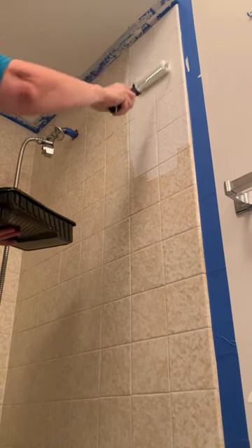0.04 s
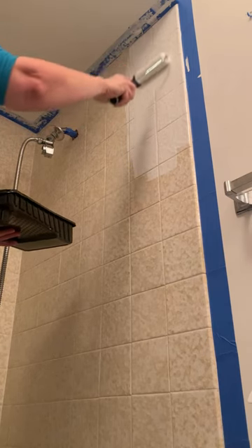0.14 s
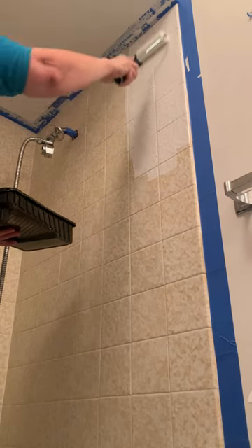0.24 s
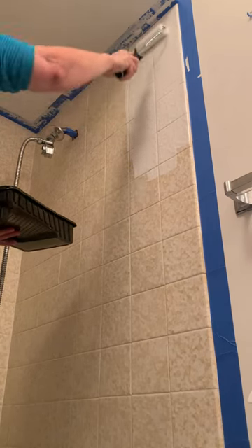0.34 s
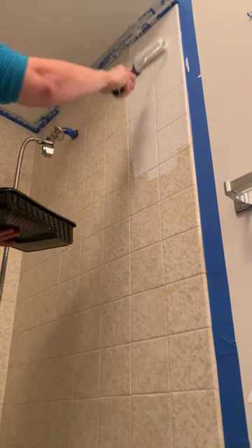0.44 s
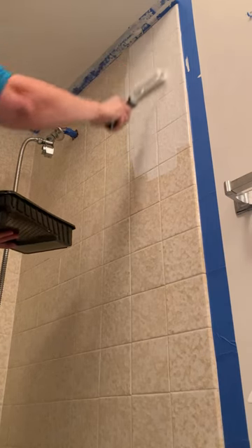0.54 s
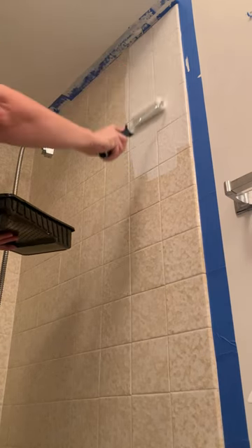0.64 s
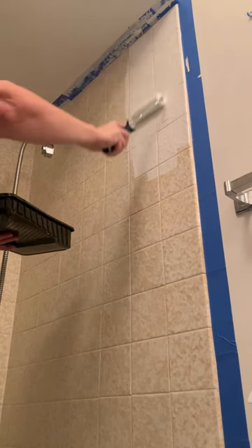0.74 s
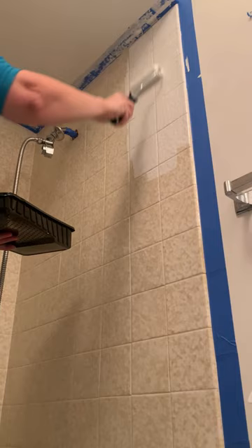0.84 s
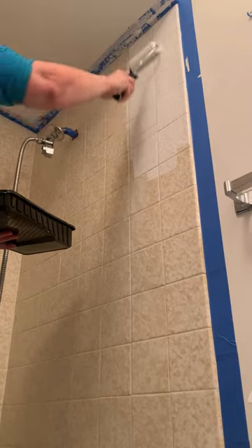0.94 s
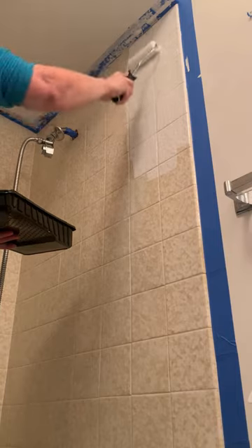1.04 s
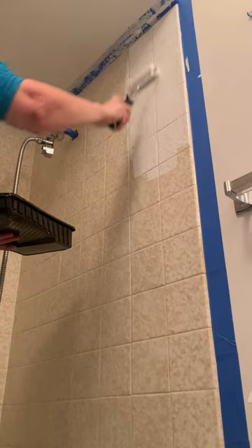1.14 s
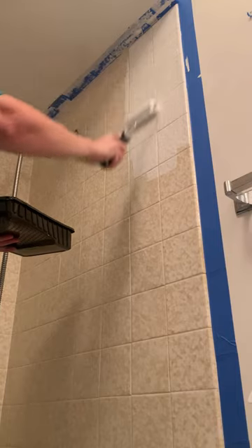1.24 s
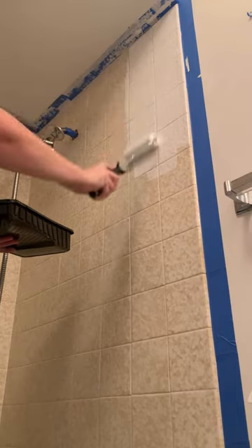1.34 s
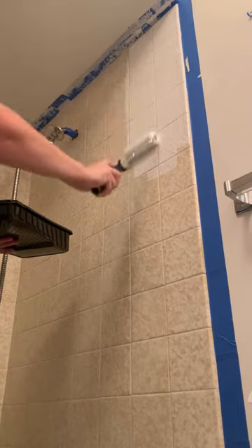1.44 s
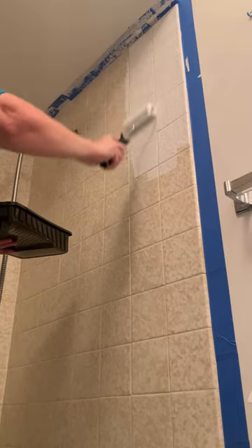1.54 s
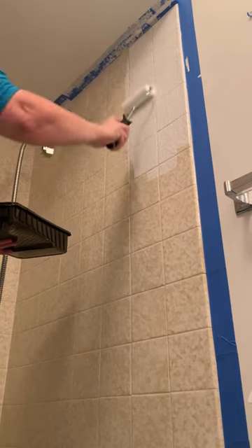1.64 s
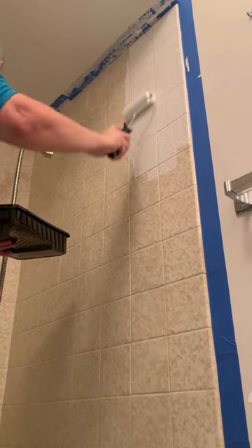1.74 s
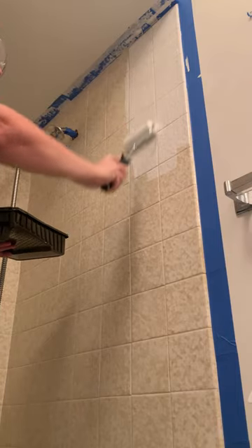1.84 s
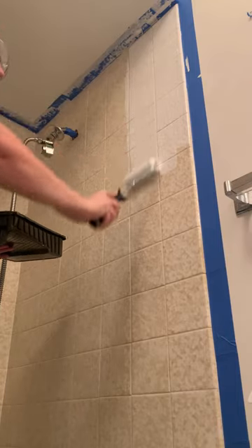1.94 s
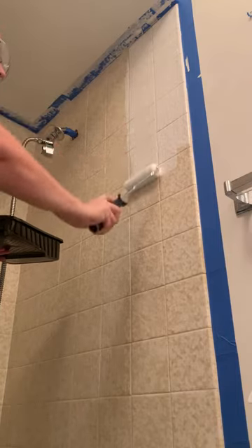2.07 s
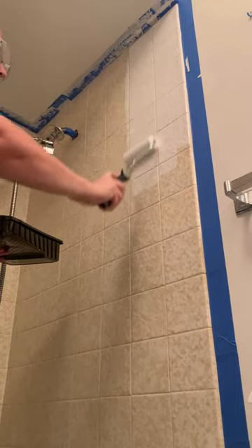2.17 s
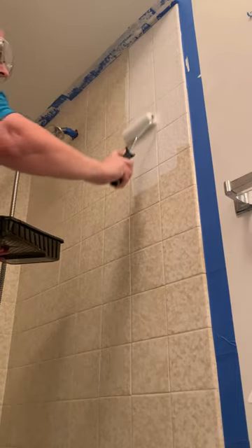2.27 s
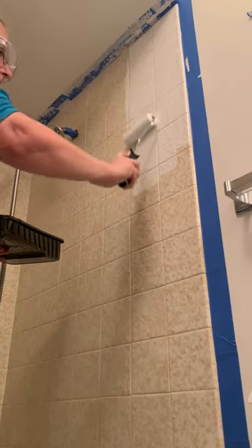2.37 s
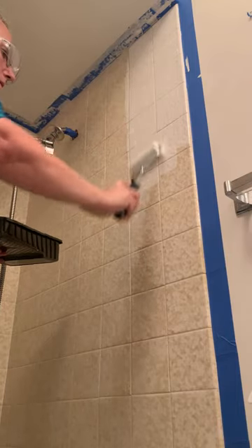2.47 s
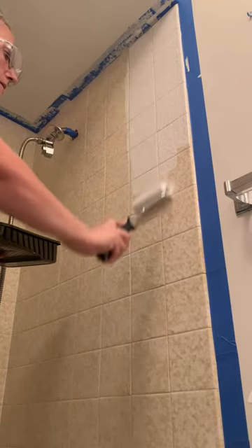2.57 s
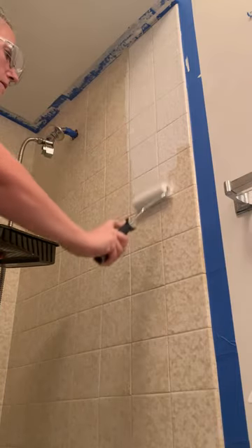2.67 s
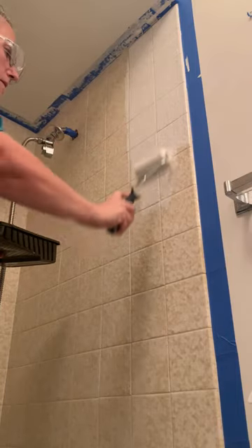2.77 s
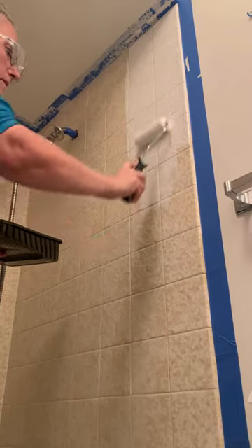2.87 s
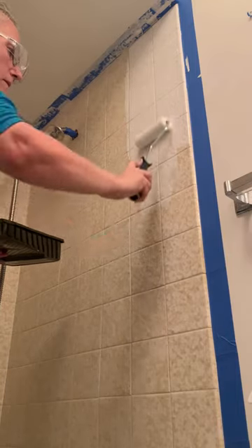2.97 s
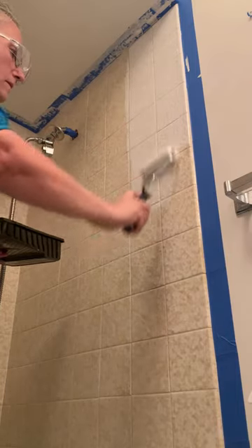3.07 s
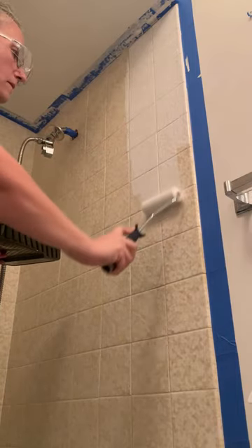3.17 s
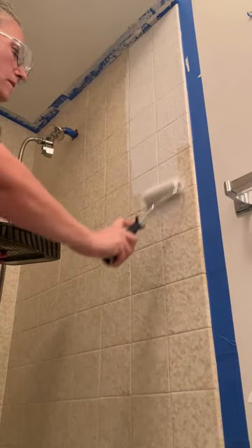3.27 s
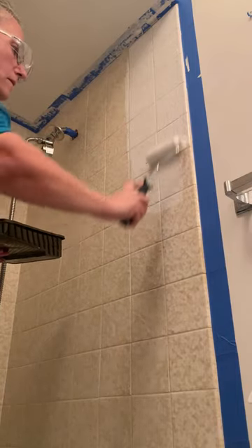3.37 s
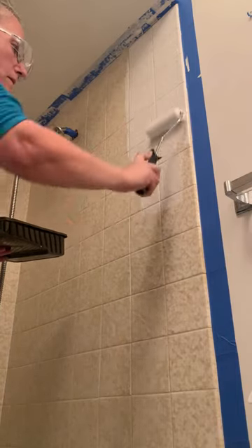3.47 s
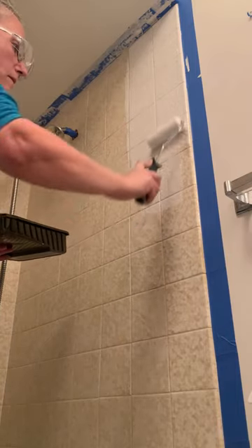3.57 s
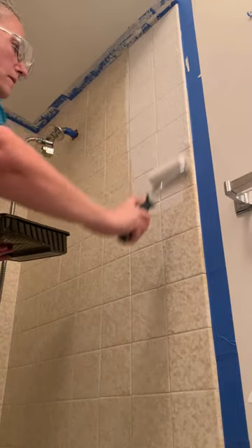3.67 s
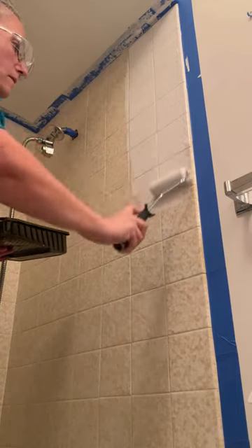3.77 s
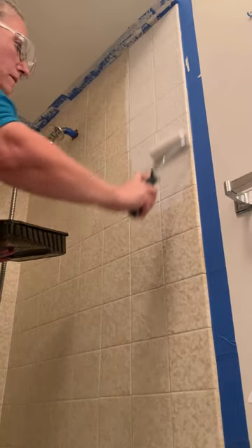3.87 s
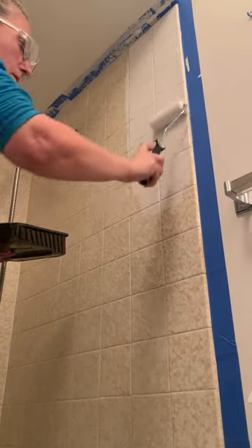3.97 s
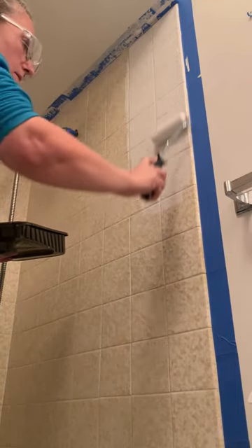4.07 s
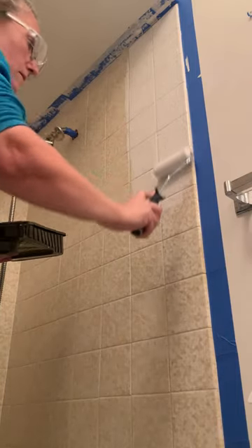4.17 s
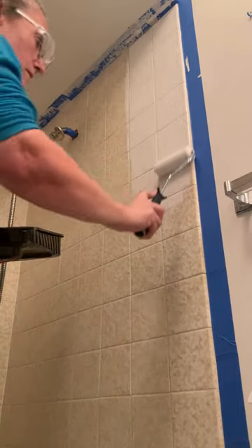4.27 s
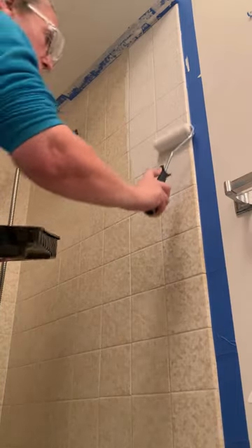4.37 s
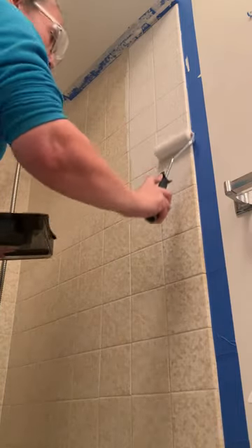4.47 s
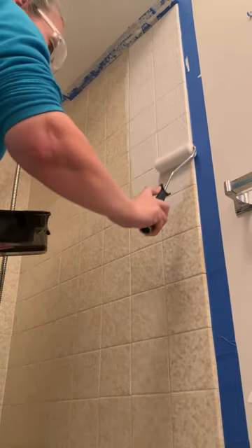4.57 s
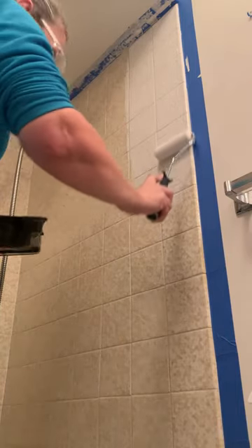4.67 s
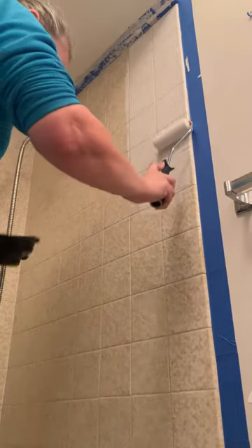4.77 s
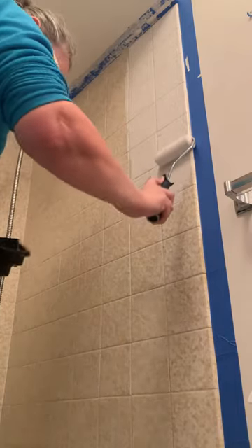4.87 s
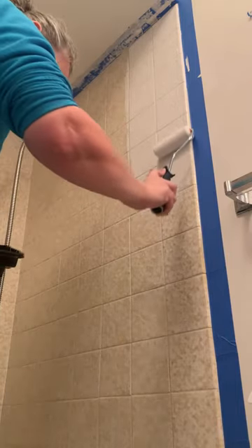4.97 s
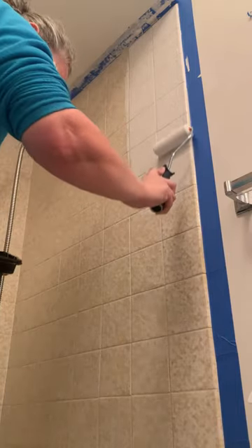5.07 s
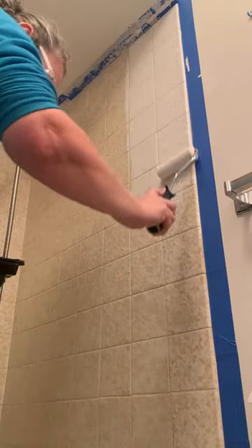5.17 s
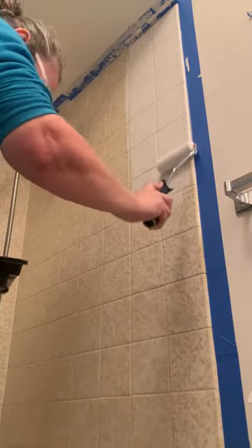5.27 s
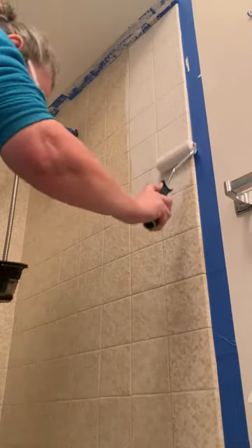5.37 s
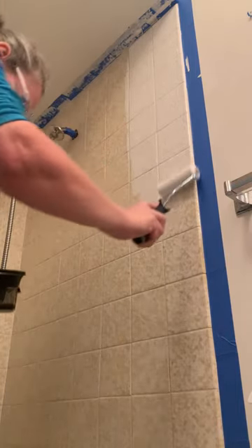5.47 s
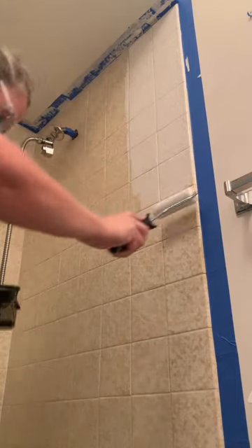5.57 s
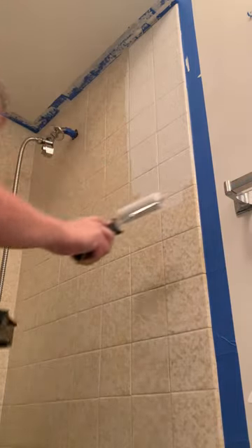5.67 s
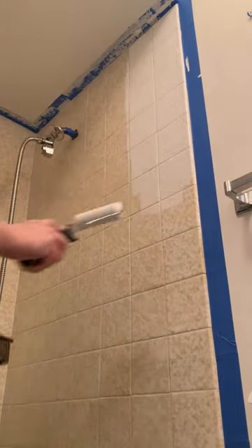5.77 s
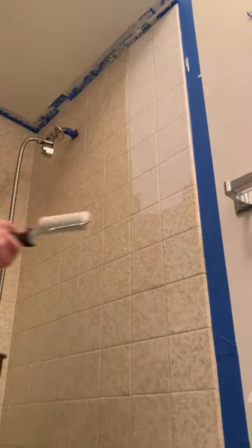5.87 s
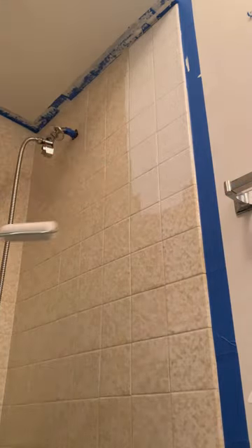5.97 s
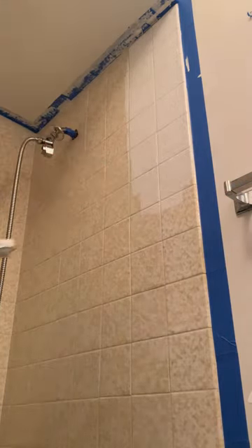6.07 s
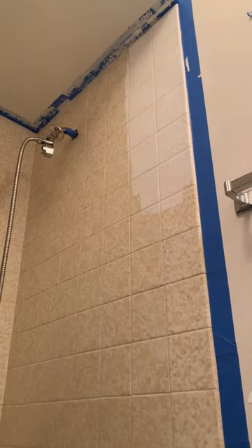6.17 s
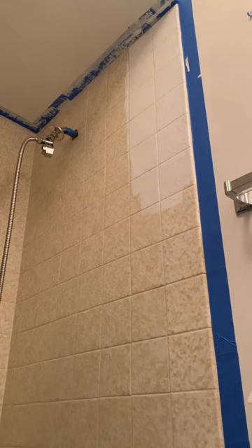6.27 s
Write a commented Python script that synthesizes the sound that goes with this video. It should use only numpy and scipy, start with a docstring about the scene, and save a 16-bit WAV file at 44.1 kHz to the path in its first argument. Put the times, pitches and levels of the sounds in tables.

```python
"""In a small tiled shower stall, a foam roller runs up and down over wet paint on the wall. Random clicks,
filtered, make the fine fizz of snapping paint strands, the squelch and the rub; short pings are bursting
bubbles, ticks are tearing threads. Filtered noise is the rumble of the hollow wall and the murmur of the house;
decaying sines boom at each thump. The roller scrapes and lifts off, its cage knocks, and the plastic paint tray
in the other hand knocks and rattles in bursts of contacts."""
import sys
import numpy as np
from scipy import signal
from scipy.fft import rfft, irfft
from scipy.io import wavfile
from scipy.ndimage import uniform_filter1d

SR = 44100
rng = np.random.default_rng(int(sys.argv[2]) if len(sys.argv) > 2 else 0)


def wav_record(signal):
    """Record a signal, one row per channel, as 16-bit PCM in the file named by sys.argv[1]."""
    frames = np.transpose(np.atleast_2d(signal))
    bounded = np.clip(frames, -1, 1)
    # unit amplitude maps onto the largest positive 16-bit level
    quanta = np.round(bounded * 32767).astype(np.int16)
    wavfile.write(sys.argv[1], SR, quanta)


N = 278712
T = np.arange(N) / SR
LIFT_OFF_S = 5.415  # the roller leaves the wall

# spectrum of squelching wet foam: [f/Hz, density/dB per Hz]
SQUELCH_SPECTRUM = [(100, -15.5), (300, -0.5), (500, 2), (800, 1.5), (1150, -1), (1600, -2.5), (2500, -9),
                    (4000, -3), (6000, -27.5), (10000, -20)]
# resonances of the roller cage: [f/Hz, width/Hz, height above the spectrum/dB]
CAGE_PEAKS = [(600, 20, 2.5), (798, 66, 2), (1060, 36, 5.5), (1190, 64, 6), (1400, 76, 5.5), (1575, 41, 7),
              (1980, 660, 6.5)]
# low booms of the stall: [f/Hz, width/Hz, height above the spectrum/dB]
STALL_BOOMS = [(35.5, 5.9, 3.8), (76.3, 12, 10.6), (120, 7.6, 7.8), (159.6, 11.2, 8.5), (192, 7.5, 5),
               (278.5, 24, 6.5), (374, 22, 8)]


def amp(db):
    """Decibels to gain."""
    return 10 ** (np.asarray(db) / 20)


def unit(x):
    """Scales to rms 1."""
    return x / np.sqrt(np.mean(x ** 2) + 1e-20)


def read(points, hz):
    """Reads a table on a log-frequency axis."""
    f, value = np.transpose(points)
    return np.interp(np.log(hz + 1), np.log(f + 1), value)


def add(mix, s, sound):
    """Mixes a sound in at time s."""
    part = mix[round(s * SR):][:len(sound)]
    part += sound[:len(part)]


def colour(x, spectrum, peaks=(), tilt_db=0, size=8192):
    """Causal filter: a spectrum, resonances on top and a tilt in dB per octave above 1 kHz."""
    hz = abs(np.fft.fftfreq(size, 1 / SR))
    db = read(spectrum, hz) + tilt_db * np.log2(np.maximum(hz, 1000) / 1500)
    for f, width, height in peaks:
        db = db + height / (1 + (2 * (hz - f) / width) ** 2)
    # minimum phase: the energy comes as early as the spectrum allows
    response = np.exp(signal.hilbert(np.log(amp(db))).conj())
    taps = np.fft.ifft(response).real
    return signal.oaconvolve(x, taps[:size // 2])[:len(x)]


def wander(hz):
    """Random drift of rms 1 that rolls off above a rate."""
    f = np.fft.rfftfreq(N, 1 / SR)
    return unit(irfft(rfft(rng.standard_normal(N)) / (1 + (f / hz) ** 2), N))


def pops(per_s, spread_db, count=N):
    """Random clicks of uneven size and either sign."""
    size = amp(spread_db * np.minimum(rng.exponential(1, count), 5))
    sign = rng.choice([-1, 1], count)
    happens = rng.random(count) < per_s / SR
    return size * sign * happens


def ring(modes, t):
    """One blow on a set of decaying modes; each blow shares the energy out a little differently."""
    shares_db = rng.normal(0, 1.5, len(modes))
    out = 0
    for (hz, db, t60), share_db in zip(modes, shares_db):
        out = out + amp(db + share_db - 60 * t / t60) * np.sin(2 * np.pi * hz * t)
    return out


def stall(x):
    """Diffuse tail of the stall: noise, different in each port, decaying at its own pace in each band."""
    # decay time of the stall: [f/Hz, t60/s]
    stall_t60 = [(100, 0.69), (500, 0.38), (1500, 0.25), (4000, 0.16), (9000, 0.85), (15000, 0.38)]
    echoes = rng.standard_normal((2, SR)) * (np.arange(SR) > .004 * SR)
    hz, t, z = signal.stft(echoes, SR, nperseg=256)
    decay = amp(-60 * t / read(stall_t60, hz)[:, None])
    decay = decay / np.linalg.norm(decay, axis=1, keepdims=True)
    tail = signal.istft(z * decay, SR, nperseg=256)[1]
    return signal.fftconvolve(x[None], tail / np.linalg.norm(tail[0]), axes=1)[:, :N]


def placed(x, distance, moving=False):
    """Direct sound leads at the left port; the stall's share grows with relative distance."""
    # direct share of the energy at distance 1: [f/Hz, share]
    direct_share = [(100, 0.98), (250, 0.58), (500, 0.91), (1000, 0.88), (1600, 0.44), (2700, 0.043),
                    (3700, 0.77), (4300, 1), (15000, 0.99)]
    # phase lead of the left port on top of its time lead: [f/Hz, lead/rad]
    phase_lead = [(120, 0), (200, -.5), (300, -2.1), (500, -3.5), (1000, -3.85)]
    left_lead_s = 10.4 / 44100
    drift_hz = 2.6  # half turns per second between the two tails of a moving source

    hz = np.fft.rfftfreq(N, 1 / SR)
    near = np.clip(read(direct_share, hz), .01, .9995)
    share = near / (near + (1 - near) * distance ** 2)
    lead = 2 * np.pi * hz * left_lead_s + read(phase_lead, hz)
    direct = rfft(x) * np.array([np.ones(len(hz)), np.exp(-1j * lead)])
    if moving:
        turn = np.pi * drift_hz * T
        tail = stall(x * np.cos(turn)) + stall(x * np.sin(turn))
    else:
        tail = stall(x)
    return irfft(np.sqrt(share) * direct + np.sqrt(1 - share) * rfft(tail), N)


def air():
    """Low murmur of the house: noise booming in the stall, with faint tones that waver."""
    # spectrum of the murmur: [f/Hz, density/dB per Hz]
    murmur_spectrum = [(15, -14.5), (35, -5), (80, -4), (160, -4), (210, -6), (270, -6.5), (400, -9.5),
                       (600, -14.5), (1100, -23), (1600, -27.5), (2500, -36), (4000, -40.5), (8000, -40.5),
                       (15000, -47)]
    # narrow tones in the murmur: [f/Hz, width/Hz, level/dB]
    faint_tones = [(495, 16, -77), (625, 12, -74), (1098, 39, -75.5), (1282, 46, -79.5), (1750, 57, -88)]
    waver_db, waver_hz = 2.5, 11  # each tone swells and fades on its own

    noise = unit(colour(rng.standard_normal(N), murmur_spectrum, STALL_BOOMS))
    murmur = amp(-58.0 + 1.67 * wander(hz=9.6)) * noise
    for hz, width, db in faint_tones:
        # two random drifts on a cosine and a sine make a narrow band of noise
        tone = wander(hz=width / 2) * np.cos(2 * np.pi * hz * T)
        tone = tone + wander(hz=width / 2) * np.sin(2 * np.pi * hz * T)
        murmur = murmur + amp(db) * unit(tone * amp(waver_db * wander(hz=waver_hz)))
    return murmur


def tray():
    """A firm contact and a rattle of smaller ones crack and set the tray's modes ringing; the roller cage
    knocks first."""
    # knocks, the first from the roller cage, the rest from the tray: [t/s, level before the swell/dB, rise/s,
    # brightness/dB per octave, spot ring f/Hz]
    knocks = [(5.508, -37.5, 0.0025, -8, 1290), (5.513, -38.5, .004, -10.5, 1060),
              (5.520, -38, 0.0025, -4, 1290), (5.535, -38.5, 0.0031, 0.5, 834),
              (5.543, -34.5, .0018, 1, 3000), (5.548, -30.5, .0015, -3, 1163),
              (5.552, -36.5, .002, 1.5, 1640), (5.571, -45.5, 0.0081, 3, 834), (5.60, -52.5, .017, 2, 590),
              (5.655, -54, 0.022, -1, 594), (5.703, -53, 0.0034, 2, 3350), (5.711, -47.5, .0025, 4.5, 2330),
              (5.722, -55, .008, 6, 820), (5.744, -60.5, 0.013, 3, 3350), (5.91, -60, .001, 17.5, 7400),
              (5.898, -67.5, 0.056, -14, 624), (6.18, -76, .06, 3, 3300), (6.275, -62, 0.087, 5.5, 3300)]
    # modes of the plastic tray: [f/Hz, level/dB, t60/s]
    tray_modes = [(590.6, 3, .45), (700, 1, .15), (834, 0, .22), (1060, -9, .12), (1163, 1, .22),
                  (1290, 1, .1), (1415, -4, 0.16), (1588, 3, 0.2), (1660, -2.5, .22), (1814, -10, .3),
                  (1943, -2, .18), (2054, -3, 0.16), (2616, -6, .15), (3220, -4, .1)]
    # spectrum of the crack: [f/Hz, density/dB per Hz]
    crack_spectrum = [(100, -6), (450, -1.5), (750, -0.5), (1150, -1.5), (1900, 2), (2800, -5.5),
                      (4000, -6), (6000, -8), (9000, -21.5), (15000, -33)]
    contacts_per_s = 1800  # before the swell
    first_weight, hard_s = 1.26, 0.0058  # the first blow weighs less the slower the rise
    spot_width_hz, spot_db = 150, 8.5  # width and height of the ring of the spot

    out, t = np.zeros(N), T[:SR // 2]
    for s, clatter_db, rise, tilt_db, hz in knocks:
        swell = t / rise * np.exp(1 - t / rise)
        rattle = pops(contacts_per_s, spread_db=0.0, count=len(t)) * swell
        first = first_weight * np.exp(-rise / hard_s) * np.linalg.norm(rattle) * (t == 0)
        spot = [(hz, spot_width_hz, spot_db)]
        crack = colour(rattle + first, crack_spectrum, spot, tilt_db=tilt_db)
        modes = ring(tray_modes, t)
        body = signal.fftconvolve(crack, modes / np.linalg.norm(modes))[:len(t)]
        body = amp(-6) * body / 2
        add(out, s, amp(clatter_db) * unit(crack + body) * np.sqrt(np.mean(swell ** 2)))
    return out


def scrape():
    """The roller's end drags along the tape, catches, then chatters in slips that ring the cage."""
    # the catch as the roller lets go: (t/s, length/s, level/dB)
    catch = (5.407, 0.064, -54.5)
    # spectrum of the scrape: [f/Hz, density/dB per Hz]
    scrape_spectrum = [(200, -22), (600, -9), (920, 2.5), (1200, 2), (1500, -5), (2100, -7.5), (3000, -11),
                       (5000, -26), (10000, -52)]
    slips_per_s, slip_jitter = 220, .55  # median rate of stick and slip, log spread of the gaps
    catch_db, catch_s = 11, .008  # the first catch is the hardest: extra force and its decay
    lead_s, fade_s = .007, 0.021  # swell and decay of the drag about the catch; final fade

    s, length, db = catch
    out, t = np.zeros(N), T[:SR // 4]
    slip_s = np.cumsum(np.exp(slip_jitter * rng.standard_normal(size=60))) / slips_per_s
    slip_samples = ((slip_s - slip_s[0]) * SR).astype(int)
    slips = np.bincount(slip_samples, minlength=len(t))[:len(t)]
    force = amp(db + catch_db * np.exp(-t / catch_s)) * np.clip((length - t) / fade_s, 0, 1)
    even = colour(slips * 1., scrape_spectrum, CAGE_PEAKS)  # slips of equal force set the scale
    add(out, s, colour(slips * force, scrape_spectrum, CAGE_PEAKS) / np.std(even))
    drag = unit(colour(pops(900, spread_db=1.0), scrape_spectrum, CAGE_PEAKS))
    return out + drag * amp(db - 3) * np.exp(-abs(T - s) / lead_s)


def motion():
    """Arm: speed 0-1 easing through each turn, stroke strength dB, upward push dB, wetness dB."""
    # strokes, down and up in turn: [t of the turn/s, strength/dB, wetness/dB]
    strokes = [(-0.02, -2.5, 0), (0.247, -0.4, -1.5), (0.607, 0, -0.5), (0.924, 1.5, -0.5),
               (1.316, -1, -1.5), (1.596, -0.5, -.5), (1.94, -2, 0), (2.248, -0.5, 0), (2.543, -0.5, 0),
               (2.855, -2, 0), (3.127, -1.4, 1), (3.428, -2.5, -0.5), (3.667, 0, 1.5), (3.922, -4.5, 1),
               (4.146, -5.5, 0.5), (4.331, -9.5, -0.5), (4.485, -8, -1), (4.649, -14.5, -2.5),
               (4.785, -15, -2.5), (4.929, -11, -1), (5.097, -13.5, 0.5), (5.225, -11, 1.5)]
    down_fastest, up_fastest = .52, .58  # share of a stroke at which the roller is fastest
    # the arm leans in on the way up: height in dB, place and width as shares of the stroke
    up_push_db, push_at, push_width = 3.5, 0.7, 0.49

    turn, strength_db, wet_db = np.transpose(strokes)
    edges, up = np.append(turn, LIFT_OFF_S), np.arange(len(turn)) % 2
    fastest = turn + np.where(up, up_fastest, down_fastest) * np.diff(edges)
    times = np.sort(np.append(edges, fastest))
    # a quarter cycle from each turn to the fastest point, and another to the next turn
    speed = abs(np.sin(np.pi / 2 * np.interp(T, times, np.arange(len(times)))))
    stroke = np.maximum(np.searchsorted(turn, T) - 1, 0)
    progress = (T - turn[stroke]) / np.diff(edges)[stroke]
    push_db = up_push_db * up[stroke] * np.exp(-((progress - push_at) / push_width) ** 2)
    strength_db = uniform_filter1d(strength_db[stroke], size=1500)
    wet_db = uniform_filter1d(wet_db[stroke], size=1500)
    return speed, strength_db, push_db, wet_db


def wall(speed, strength_db, push_db):
    """The hollow wall rumbles in lumps; a bump booms at its spot's pitch and slaps the wet paint."""
    # roller bumps, then thuds as the arm swings away: [t/s, boom/dB, slap/dB, spot f/Hz]
    thumps = [(0.44, -43, -59, 109), (0.531, -38.5, -51, 124.7), (.785, -33.5, -67, 135.4),
              (1.075, -37.5, -60, 130), (1.14, -35, -49, 147.3), (1.198, -39.5, -47.5, 162.6),
              (1.232, -31.5, -53, 92.7), (1.43, -42.5, -57, 124), (1.505, -48, -68, 142),
              (1.745, -44, -43, 108), (1.768, -38, -58, 155), (1.8, -37, -53, 83.5),
              (2.402, -60, -43.5, 125.1), (2.509, -38.5, -62, 74.76), (2.70, -39.5, -60, 76.4),
              (3.075, -36.5, -43, 158), (3.576, -37.5, -47.5, 146.1), (3.612, -42, -60, 162),
              (3.775, -37.5, -59, 126.4), (3.87, -40, -54, 122), (4.02, -52, -46, 119),
              (4.072, -34, -61, 140.4), (4.465, -50, -59, 235), (4.69, -48.5, -55, 232),
              (5.01, -41.5, -51.5, 139), (5.517, -38, -42, 109), (5.546, -30.5, -33, 104),
              (5.556, -38.5, -51, 239.5), (5.706, -33.5, -48, 111), (5.716, -41.5, -58, 206),
              (5.77, -42.5, -67, 216), (5.98, -49, -93, 132), (6.03, -46.5, -82, 155),
              (6.185, -43, -72, 156), (6.265, -44.5, -79, 168)]
    # modes a thump rings, of the hollow wall and, higher up, of the stall: [f/Hz, level/dB, t60/s]
    thump_modes = [(80.2, -9, 0.38), (113.3, -4.5, 0.47), (155, -13, 0.2), (194.7, -5.5, 0.22),
                   (237.5, -8.5, 0.15), (279.8, -5.5, 0.21), (364, -10, .2), (486, -9, 0.14)]
    # spectrum of the rumble: [f/Hz, density/dB per Hz]
    rumble_spectrum = [(15, -41), (32, 3), (50, 5), (76, 1), (95, -1.5), (130, 5), (165, -0.5),
                       (230, -13.5), (400, -31.5), (900, -32)]
    rumble_db = -53.5  # at full speed in a stroke of 0 dB, without push or lumps
    follows, push_share = 0.38, 0.27  # dB per dB of stroke strength and of push
    at_turn = 0.9  # share of the rumble left at a turn
    lump_db, lump_hz = 2.5, 13.6  # the roller is not quite round: depth (rms), rate
    spot_t60_s, cushion_s = 0.17, 0.0074  # ring of the spot, give of the foam
    modes_db = -8  # ring of the wall and stall modes against the spot's

    touching = np.clip((LIFT_OFF_S + .15 - T) / .1, 0, 1)  # dies away just after lift-off
    rolling = at_turn + (1 - at_turn) * speed
    load_db = rumble_db + follows * strength_db + push_share * push_db
    load_db = load_db + lump_db * wander(hz=lump_hz)
    rumble = unit(colour(rng.standard_normal(N), rumble_spectrum, STALL_BOOMS))
    out = rumble * amp(load_db) * rolling * touching
    t = T[:SR // 2]
    for s, boom_db, slap_db, hz in thumps:
        wet = pops(3000, spread_db=3.0, count=len(t))
        slap = unit(colour(wet, SQUELCH_SPECTRUM, CAGE_PEAKS)) * np.exp(-t / 0.02)
        spot = np.sin(2 * np.pi * hz * t) * amp(-60 * t / spot_t60_s)
        boom = spot + amp(modes_db) * ring(thump_modes, t)
        onset = 1 - np.exp(-t / cushion_s)
        add(out, s, (amp(boom_db) * boom + amp(slap_db) * slap) * onset)
    return out


def bubbles(pace):
    """Paint bubbles burst in short pings: more at speed, their size drifting from clump to clump."""
    per_s, cycles = 210, 6.4  # rate at full pace; cycles until a ping falls to 1/e
    typical_hz, spread, drift = 1087, 0.403, 0.303  # octaves within a clump, and between clumps

    t, out = T[:SR // 32], np.zeros(N)
    bursts = pops(per_s * pace, spread_db=2.3)
    clump = drift * wander(hz=8.73)
    for i in np.flatnonzero(bursts):
        hz = typical_hz * 2 ** (clump[i] + spread * rng.standard_normal())
        add(out, T[i], bursts[i] * np.sin(2 * np.pi * hz * t) * np.exp(-hz * t / cycles))
    return unit(out)


def crackle(pace, count=16):
    """Threads of paint tear off the nap in bunches, each a tick of a few cycles at one of 16 pitches."""
    per_s, cycles = 260, 2.7  # rate at full pace before bunching; cycles until a tick falls to 1/e
    low_hz, high_hz = 814, 4300
    bunch_db, bunch_hz = 5, 22  # depth (rms) and rate of the bunches

    t, out = T[:SR // 64], np.zeros(N)
    bunches = amp(bunch_db * wander(hz=bunch_hz))
    ticks = pops(per_s * pace * bunches, spread_db=2.5)
    kind = rng.integers(0, count, N)
    for k, hz in enumerate(np.geomspace(low_hz, high_hz, count)):
        tick = unit(np.sin(2 * np.pi * hz * t) * np.exp(-hz * t / cycles))
        for i in np.flatnonzero(ticks * (kind == k)):
            add(out, T[i], ticks[i] * tick)
    return unit(out)


def patchy(x):
    """Wet spots colour the squelch in passing: short, narrow patches of spectrum rise and dip."""
    depth_db, width_hz, length_s = 3, 500, .035
    hz, t, z = signal.stft(x, SR, nperseg=512, noverlap=384)
    field = rng.standard_normal(z.shape[::-1]).T
    field = uniform_filter1d(field, size=round(width_hz / hz[1]), axis=0)
    field = uniform_filter1d(field, size=round(length_s / t[1]), axis=1)
    gain = unit(amp(depth_db * unit(field)))
    return signal.istft(z * gain, SR, nperseg=512, noverlap=384)[1][:N]


def roller(speed, strength_db, squeeze_db):
    """Paint strands snap in a fizz; soaked foam squelches, bubbles, crackles and rubs on the glaze."""
    # spectrum of the snapping strands: [f/Hz, density/dB per Hz]
    fizz_spectrum = [(200, -2.5), (900, -23), (2500, -6), (4000, -9.5), (6000, -0.5), (9000, -1),
                     (13000, 0.5), (16000, -3.5)]
    # spectrum of foam rubbing on the glaze: [f/Hz, density/dB per Hz]
    rub_spectrum = [(800, -14.5), (2000, -7.5), (3300, -2.5), (5500, 8.5), (7500, -0.5), (14000, -15)]
    # base levels, before pace, stroke strength and random surges
    fizz_db, squelch_db, rub_db, bubble_db, crackle_db = -50.5, -58, -59, -58.5, -64
    squelch_follows = 0.62  # dB per dB of stroke strength
    linger_s = .11  # the foam stays squeezed through a turn
    nap_db, nap_hz = 1.5, 29.8  # unevenly soaked foam: depth (rms) and rate of the clumps
    tack_db, tack_hz = 2, 25.6  # the foam sticks and lets go: depth (rms) and rate of the surges

    pace = (0.06 + .94 * speed) * np.clip((LIFT_OFF_S - T) / 0.059, 0, 1)
    strands = unit(colour(pops(16000 * pace, spread_db=0.0), fizz_spectrum))
    fizz = strands * pace ** 0.69 * amp(fizz_db + strength_db + 0.95 * wander(hz=24))

    cells = colour(pops(1300 * (.15 + pace), spread_db=1.36), SQUELCH_SPECTRUM, CAGE_PEAKS)
    clumps_db = nap_db * wander(hz=nap_hz)
    wet = amp(squelch_db) * unit(cells)
    wet = wet + amp(bubble_db) * bubbles(pace) + amp(crackle_db) * crackle(pace)
    squeezed = abs(uniform_filter1d(pace, size=round(linger_s * SR))) ** 0.44
    wet_gain = amp(squelch_follows * strength_db + squeeze_db + clumps_db)
    squelch = patchy(wet) * squeezed * wet_gain

    grains = unit(colour(pops(6000, spread_db=1.0), rub_spectrum))
    surges_db = tack_db * wander(hz=tack_hz)
    rub = grains * np.sqrt(pace) * amp(rub_db + 0.44 * strength_db + surges_db)
    return placed(fizz, distance=.8) + placed(squelch + rub, distance=1.3, moving=True)


def scene():
    """One arm movement drives roller and wall close by; the tray is farther off."""
    speed, strength_db, push_db, wet_db = motion()
    background = placed(air(), distance=0.94)
    lift_off = placed(tray(), distance=2.2) + placed(scrape(), distance=1.6)
    rumbling = placed(wall(speed, strength_db, push_db), distance=0.87)
    painting = roller(speed, strength_db, push_db + wet_db)
    return background + lift_off + rumbling + painting


def record(dry):
    """The left port takes more bass; then a steep low-pass limits the band."""
    # level difference of the ports: [f/Hz, left minus right/dB]
    port_balance = [(40, 8), (110, 5), (200, 13), (380, 4.5), (600, 0.5), (1000, -0.3), (4000, -0.5)]
    edge_hz = 15800
    tilt_db = read(port_balance, np.fft.rfftfreq(N, 1 / SR)) / 2
    ports = irfft(rfft(dry) * amp([tilt_db, -tilt_db]), N)
    low_pass = signal.firwin(2047, edge_hz, window=("kaiser", 9), fs=SR)
    return signal.oaconvolve(ports, low_pass[None], "same")


dry = scene()
out = record(dry)
wav_record(out)
```